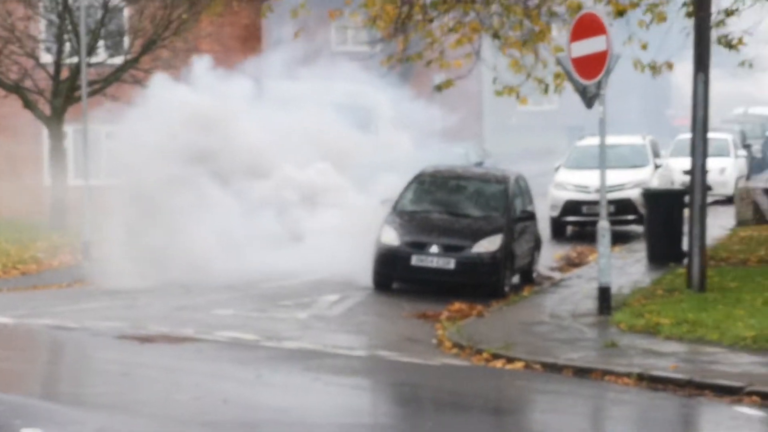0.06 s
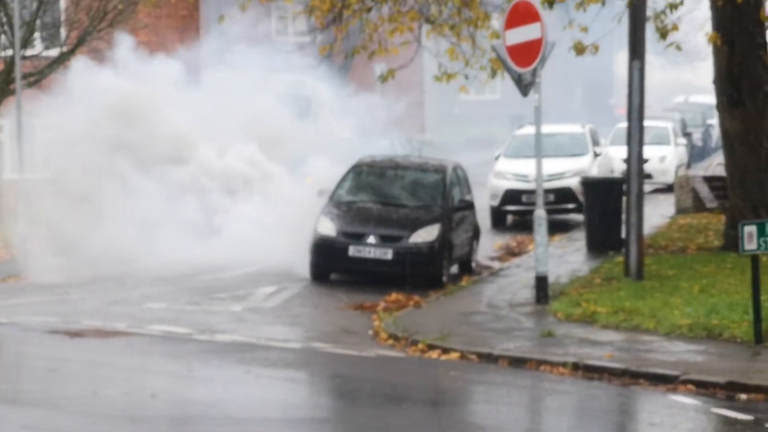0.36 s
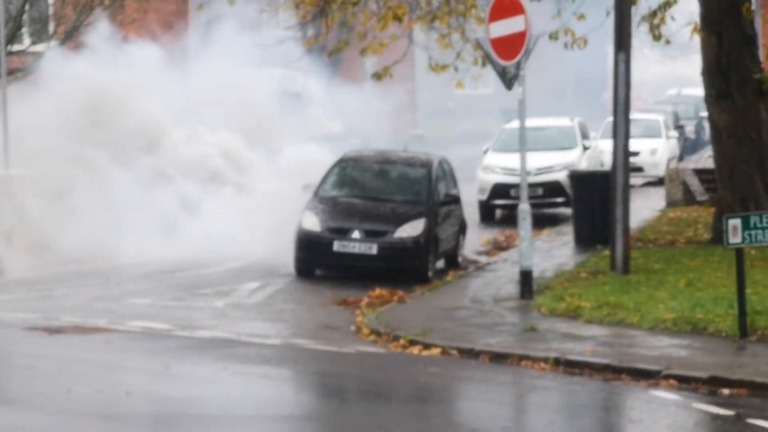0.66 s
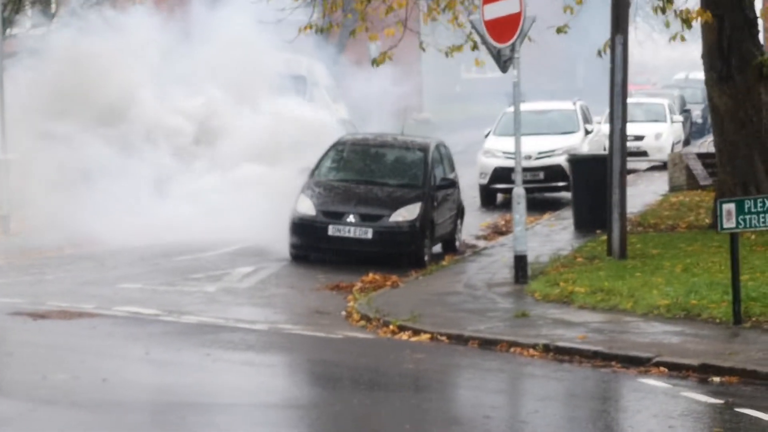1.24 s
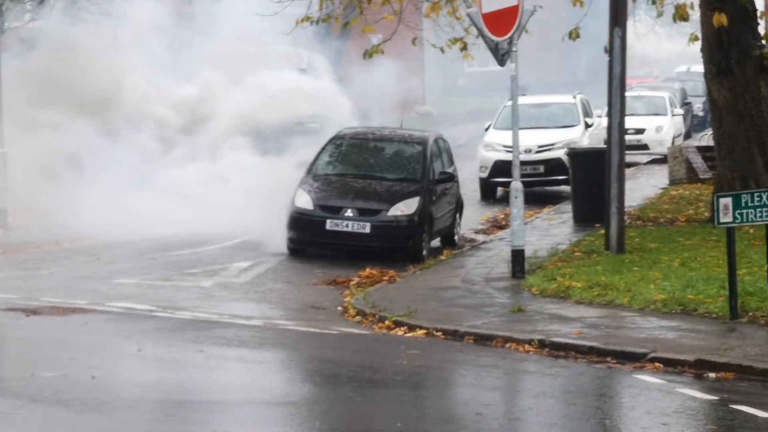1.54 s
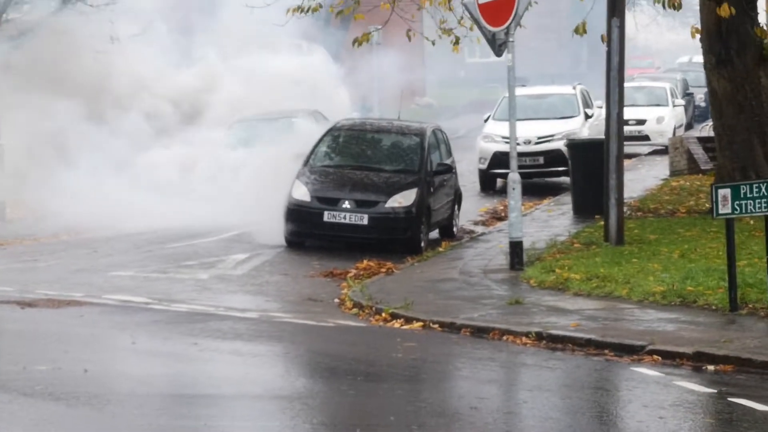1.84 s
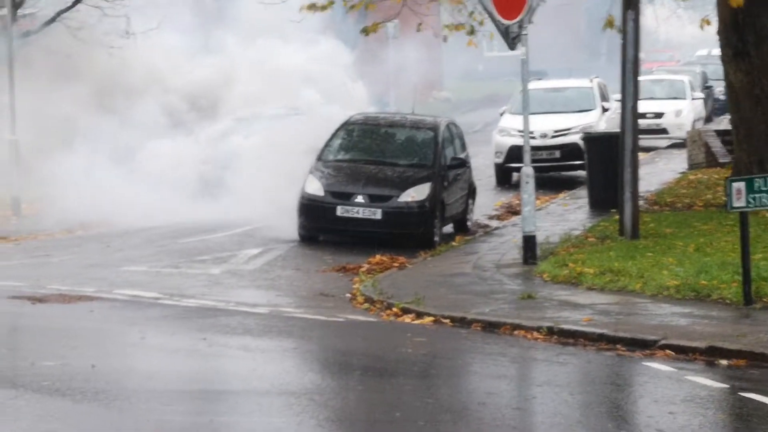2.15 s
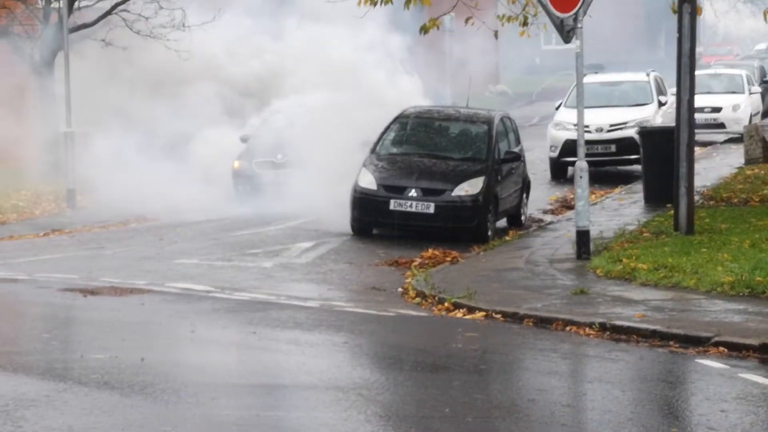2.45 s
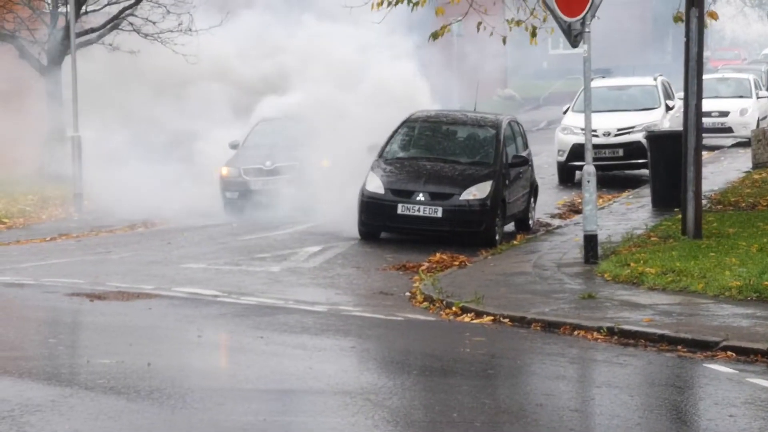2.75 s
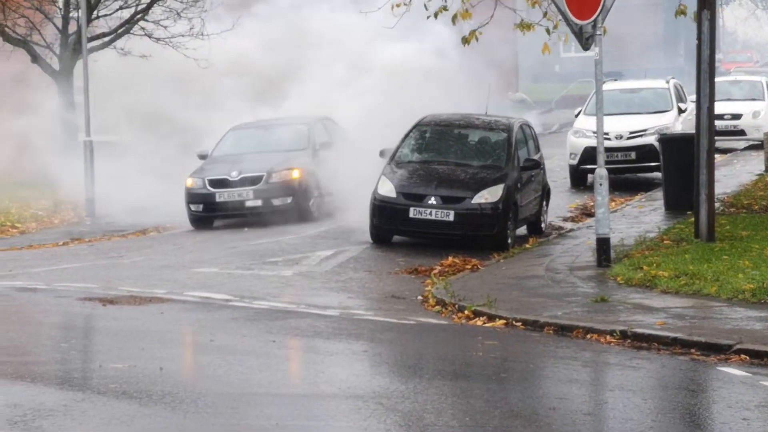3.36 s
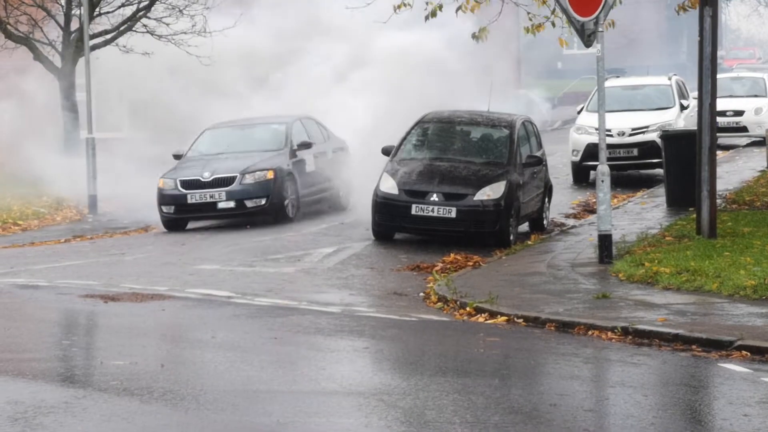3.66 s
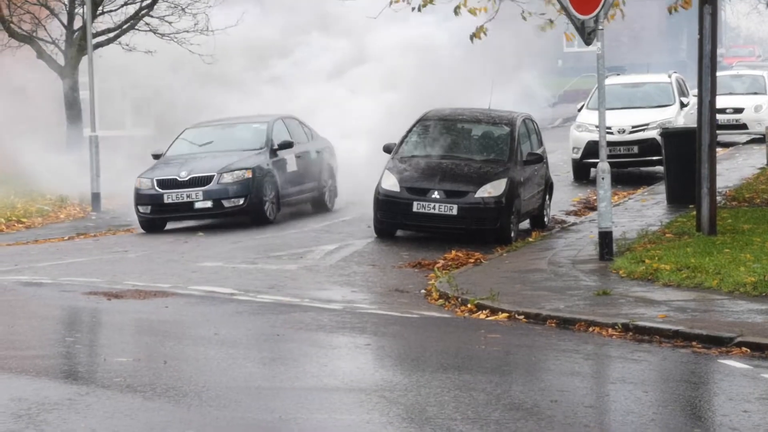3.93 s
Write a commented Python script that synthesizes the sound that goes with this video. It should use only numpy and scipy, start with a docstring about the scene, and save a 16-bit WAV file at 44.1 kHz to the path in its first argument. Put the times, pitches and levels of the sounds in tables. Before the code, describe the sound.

A diesel engine races at high revs for the whole four seconds, with rapid knocking, a shrill metallic whine and hissing gas over a faint street wash. From about 2 seconds it creeps slightly faster and grows raspier, and a thin whistle comes and goes. Wind gusts rumble and thump on the microphone on and off until about 2.3 seconds, then again near 3.8 seconds.

```python
"""Runaway diesel in a street.

The engine races at about 4250 rpm, creeping faster. Six firings a cycle knock in the block,
ring a shrill metal resonance and drive a hiss of gas; house fronts scatter the sound.
Clean multiples of the cycle rate whine and drone. Gusts buffet and thump the microphone."""
import sys
import numpy as np
from scipy import signal
from scipy.fft import rfft, irfft
from scipy.io import wavfile
from scipy.ndimage import uniform_filter1d

SR = 44100
rng = np.random.default_rng(int(sys.argv[2]) if len(sys.argv) > 2 else 0)


def wav_out(sig):
    """Save sig, one row per channel (or a flat mono array), as 16-bit PCM at SR to the path in sys.argv[1]."""
    wavfile.write(sys.argv[1], SR, np.round(np.clip(np.atleast_2d(sig).T, -1, 1) * 32767).astype(np.int16))


N = 176400
CYLINDERS, FIRING_SCATTER_DB = 6, 1.56
LOW_RPM, HIGH_RPM = 4220, 4325
MIC_LAG_MS = .41

# Engine speed: time_s, speed_rpm
ENGINE_SPEED = [(0, 4234), (.3, 4224), (.8, 4217), (1.7, 4224), (2, 4235), (2.3, 4254), (2.85, 4274),
                (3.35, 4312), (4, 4338)]
# Engine voices, relative levels: time_s, knock_db, ring_db, hiss_db
VOICE_LEVELS = [(0.0, -30, -21.5, -35.5), (0.08, -31, -26.5, -39), (0.44, -30.5, -26, -36.5),
                (0.75, -31, -27.5, -39), (1.0, -30.5, -25.5, -37.5), (1.38, -33, -27, -38.5),
                (2.02, -28, -24.5, -36), (2.08, -28, -23, -35.5), (2.44, -30.5, -25.5, -35.5),
                (2.61, -29.5, -25.5, -38.5), (3.02, -29.5, -24.5, -35.5), (3.29, -30.5, -23.5, -36.5),
                (3.54, -28, -24.5, -36), (4.0, -33.5, -27.5, -37.5)]
# Cylinders over the steady bed, in firing order: knock_db, ring_low_rev_db, hiss_db, ring_high_rev_db
CYLINDER_LEVELS = [(-14.5, 7.5, -5.5, -1.5), (3, -9, -8, -2), (-4, 2.5, -18, -1), (-3, -5, -3, 5),
                   (-2, -3, -5.5, 10.5), (-9, -16, -23, -10)]
# Block knock: freq_hz, density_db
KNOCK_SPECTRUM = [(330, -21), (620, -25.5), (850, -18), (1250, -14), (1480, -7.5), (1650, -8.5), (1880, -1),
                  (2150, -4), (2500, -5), (3200, -8.5)]
# Metal resonance: freq_hz, density_db
RING_SPECTRUM = [(1700, -13), (2250, -14), (2500, -5.5), (2720, -3.5), (2900, 2), (3080, -5.5),
                 (3350, -5.5), (3650, -10.5), (3900, -9.5), (4400, -42)]
# Ring partials: order (multiple of the cycle rate, rounded in use), low_rev_db, high_rev_db
WHINE_ORDERS = [(65.8, -53.5, -39), (74, -46.5, -30.5), (77.5, -38, -33), (80.2, -36.5, -29),
                (80.96, -32, -33.5), (82, -37.5, -38), (83.17, -33.5, -35), (83.9, -37, -40)]
# Whine swell: time_s, gain_db
WHINE_SWELL = [(0, 1), (.7, 0), (1.05, 2), (1.4, -0.5), (1.8, -0.5), (2.1, 3), (2.45, -0.5), (2.7, 3),
               (2.95, 0.5), (3.25, 1), (3.55, 2.5), (4, -1.5)]
# Cluster above the whine, relative levels: order (rounded in use), low_rev_db, high_rev_db
RASP_ORDERS = [(85.43, 4, -3), (87, 1, 0), (88.9, -10, -7), (88.3, -18, 10.5), (89.9, 0.5, 0.5),
               (91, -9, 2)]
# Rasp swell: time_s, level_db
RASP_SWELL = [(0, -30.5), (.95, -37.5), (1.75, -33), (2.1, -24), (2.45, -28.5), (2.9, -25.5), (3.25, -25.5),
              (3.55, -33), (4, -35)]
# Lower partials, relative levels: order, low_rev_db, high_rev_db
DRONE_ORDERS = [(3, -45.5, -54), (5, -46.5, -51), (9, -55.5, -63), (13, -56.5, -65), (14, -57, -58),
                (23, -56, -56), (24, -52, -52), (25, -56, -49.5), (26, -62, -63), (31, -48, -45.5),
                (32, -56.5, -49.5), (39, -47.5, -53), (42, -44.5, -45), (43, -45.5, -48), (52, -41, -42.5),
                (57, -44.5, -37.5)]
# Gas hiss: freq_hz, density_db
HISS_SPECTRUM = [(2500, -17), (3800, 0.5), (4400, -3), (5100, 0), (6200, 2), (6850, 0), (7600, -3),
                 (8200, -12), (8750, -20), (9400, -20), (12000, -25.5), (15000, -34.5)]
# Narrow band of the hiss: freq_hz, density_db
WHISTLE_SPECTRUM = [(6200, -26), (6650, 6), (6850, 2.5), (7100, -0.5), (7600, -20.5)]
# Whistle swell: time_s, level_db
WHISTLE_SWELL = [(0, -51), (1.2, -44), (1.7, -42.5), (2, -38.5), (2.2, -45), (2.4, -37), (2.6, -44),
                 (2.8, -38), (3.05, -38.5), (3.3, -46), (4, -55)]
# Wind, deep bass: freq_hz, density_db
RUMBLE_SPECTRUM = [(10, -4.5), (24, -2.5), (40, 1), (65, -3.5), (95, -12.5), (160, -33)]
# Gusts in the deep bass: time_s, relative_db
RUMBLE_GUSTS = [(0.0, -22.5), (0.04, -44), (0.08, -28), (0.51, -37.5), (0.69, -25.5), (0.9, -51),
                (1.08, -25.5), (1.26, -28), (1.28, -35), (1.34, -28), (1.4, -36.5), (1.65, -32),
                (1.67, -34), (1.86, -31), (2.21, -42), (2.31, -26.5), (2.35, -40), (2.46, -39), (2.63, -51),
                (2.66, -44.5), (3.68, -36), (3.81, -25.5), (3.88, -30), (4.0, -33)]
# Wind, upper bass: freq_hz, density_db
BUFFET_SPECTRUM = [(55, -9.5), (85, 2), (110, 0), (170, -6.5), (230, -11), (320, -28), (600, -41)]
# Gusts in the upper bass: time_s, relative_db
BUFFET_GUSTS = [(0.0, -41), (0.04, -35.5), (0.09, -47), (0.15, -23.5), (0.33, -34.5), (0.6, -36.5),
                (0.66, -26.5), (0.87, -37.5), (1.15, -40.5), (1.2, -24.5), (1.3, -41), (1.32, -30),
                (1.39, -40), (1.61, -31.5), (1.79, -39), (1.82, -37), (1.97, -45), (2.0, -29), (2.04, -41),
                (3.31, -46.5), (3.54, -41.5), (3.58, -44), (3.77, -28.5), (3.79, -45), (3.82, -24.5),
                (3.89, -39), (3.98, -35.5), (4.0, -41)]
# Eddies at the microphone: centre_s, strength_db, half_swing_ms
EDDIES = [(.165, -12, 1.8), (.218, -11, 1.6), (.646, -9, 2.4), (.664, -9.5, 7), (.692, -11.5, 3.2),
          (.754, -12, 2.4), (1.208, -12.5, 2.2), (1.335, -17.5, 3), (1.632, -13, 3.5), (2.003, -19.5, 2),
          (2.305, -14.5, 4), (3.836, -7, 5.4)]
# Street wash: freq_hz, density_db
STREET_SPECTRUM = [(100, -23), (250, 3), (400, -8), (620, -9), (850, -4.5), (1200, -8), (1800, -12),
                   (2500, 1)]
# Street wash swell: time_s, level_db
STREET_SWELL = [(0, -35.5), (1.4, -37.5), (2.2, -40.5), (2.8, -39.5), (3.5, -39.5), (4, -39)]


def knock(cycles):
    """Combustion knock in the engine block."""
    envelope = firings(cycles, column=0, attack_ms=.26, decay_ms=1.4)
    sound = voice(cycles, envelope, KNOCK_SPECTRUM, fresh=.19, memory_s=1.2, scattered=.54, lag_ms=-.03)
    return sound * pan(left_db=6) * undb(curve(VOICE_LEVELS, column=1) + .37)


def ring(cycles):
    """Shrill metal clatter: strongest on every other firing at low revs, rebalanced at high revs."""
    slow, fast = (firings(cycles, column, attack_ms=.42, decay_ms=4.5) for column in (1, 3))
    envelope = slow + (fast - slow) * revs()
    sound = voice(cycles, envelope, RING_SPECTRUM, fresh=.16, memory_s=.8, scattered=.2,
                  lag_ms=MIC_LAG_MS)
    return sound * pan(left_db=-3) * undb(curve(VOICE_LEVELS, column=2) - 2)


def whine(cycles):
    """Beating partials of the ring, with a swelling rasp just above."""
    core = partials(cycles, WHINE_ORDERS, waver_db=2.5, spread_turns=.48) * undb(curve(WHINE_SWELL))
    rasp = unit(partials(cycles, RASP_ORDERS, waver_db=3.5, spread_turns=.8)) * undb(curve(RASP_SWELL))
    return place(core + rasp, MIC_LAG_MS) * pan(left_db=-6.5)


def drone(cycles):
    """Lower engine partials; their balance shifts with speed."""
    sound = partials(cycles, DRONE_ORDERS, waver_db=1.4, spread_turns=.99) * undb(-.5)
    return place(sound, lag_ms=.1) * pan(left_db=.5)


def hiss(cycles):
    """Rushing gas and fine ticking, lightly pulsed by the firings."""
    envelope = firings(cycles, column=2, attack_ms=.079, decay_ms=1.4)
    gas = voice(cycles, envelope, HISS_SPECTRUM, fresh=.5, memory_s=1.3, scattered=.7, lag_ms=MIC_LAG_MS)
    return gas * pan(left_db=1) * undb(curve(VOICE_LEVELS, column=3) + 3.5)


def whistle():
    """Narrow edge of the gas hiss that comes and goes."""
    return colour(stereo_noise(apart=.5), WHISTLE_SPECTRUM) * pan(left_db=-7) * undb(curve(WHISTLE_SWELL))


def firings(cycles, column, attack_ms, decay_ms):
    """Envelope: each cylinder strikes, slightly unevenly, and decays over a steady bed."""
    firing = np.floor(cycles * CYLINDERS).astype(int)
    cylinder_db = np.array(CYLINDER_LEVELS)[firing % CYLINDERS, column]
    strength_db = cylinder_db + FIRING_SCATTER_DB * rng.standard_normal(N)[firing]
    onsets = np.diff(firing, prepend=firing[0])
    age_ms = np.arange(SR // 20) * 1000 / SR
    pulse = ((1 - np.exp(-age_ms / attack_ms)) * np.exp(-age_ms / decay_ms)) ** 2
    power = signal.fftconvolve(onsets * undb(strength_db) ** 2, pulse / pulse.sum())[:N] / onsets.mean()
    return np.sqrt(1 + power)


def voice(cycles, envelope, spectrum, fresh, memory_s, scattered, lag_ms):
    """Rattle pulsed by the firings, heard direct and scattered off the house fronts."""
    half_spectrum = np.array(spectrum) * [1, .5]  # applied before and after the pulsing
    rattles = (colour(rattle(cycles, fresh, memory_s), half_spectrum) for _ in range(3))
    direct, left, right = (envelope * even(x, window_ms=4.06) for x in rattles)
    return colour(blend(place(direct, lag_ms), np.array([left, right]), scattered), half_spectrum)


def rattle(cycles, fresh, memory_s, cycle_samples=1280):
    """Slowly changing pattern that repeats each cycle, plus a fresh share of noise."""
    count = int(cycles[-1]) + 2
    memory_cycles = max(int(memory_s * cycles[-1] * SR / N), 1)
    noise = rng.standard_normal(N)
    patterns = rng.standard_normal((2 * count, cycle_samples))
    orders = rfft(uniform_filter1d(patterns, memory_cycles, axis=0, mode="wrap"))
    orders[:, [round(row[0]) for row in DRONE_ORDERS + WHINE_ORDERS]] = 0  # gaps for clean partials
    evened = irfft(orders / np.sqrt(np.abs(orders) + 1e-9)).ravel()
    return blend(unit(evened[(cycles * cycle_samples).astype(int)]), noise, fresh)


def partials(cycles, table, waver_db, spread_turns):
    """Wavering multiples of the cycle rate; at low phase spread they throb once a cycle."""
    sound, climb = 0, revs()
    for order, low_db, high_db in table:
        turns = round(order) * cycles + spread_turns * rng.random() + .042 * waver(rate_hz=23)
        level_db = low_db + (high_db - low_db) * climb + waver_db * waver(rate_hz=12)
        sound = sound + undb(level_db) * np.sqrt(2) * np.sin(2 * np.pi * turns)
    return sound


def revs():
    """Climb from low to high revs, 0-1."""
    return np.clip((curve(ENGINE_SPEED) - LOW_RPM) / (HIGH_RPM - LOW_RPM), 0, 1)


def wind():
    """Gusts on the microphone: rumble and harder buffets, nearly alike on both sides."""
    rumble = colour(stereo_noise(apart=.02), RUMBLE_SPECTRUM) * undb(curve(RUMBLE_GUSTS) + 3)
    buffet = colour(stereo_noise(apart=.077), BUFFET_SPECTRUM) * undb(curve(BUFFET_GUSTS) + .5)
    return rumble + buffet


def thumps(turbulence_db=-16.5):
    """Eddies hit the microphone: one pressure swing and a burst of turbulence each."""
    turbulence = undb(turbulence_db) * even(colour(rng.standard_normal(N), BUFFET_SPECTRUM), window_ms=12)
    sound = 0
    for centre_s, strength_db, half_swing_ms in EDDIES:
        swing = (np.arange(N) / SR - centre_s) * 1000 / half_swing_ms
        sound = sound + undb(strength_db) * np.exp(-swing ** 2 / 2) * (turbulence - swing)
    return place(sound, MIC_LAG_MS)


def street():
    """Diffuse wash of engine noise and traffic between the houses."""
    wash = colour(rng.standard_normal((2, N)), STREET_SPECTRUM)
    return wash * pan(left_db=.5) * undb(curve(STREET_SWELL))


def undb(db):
    """Decibels to gain."""
    return 10 ** (np.asarray(db) / 20)


def curve(table, column=1):
    """Table column, linearly interpolated in time."""
    rows = np.array(table, float)
    return np.interp(np.arange(N) / SR, rows[:, 0], rows[:, column])


def waver(rate_hz):
    """Random values joined by straight lines."""
    return np.interp(np.arange(N) * rate_hz / SR, np.arange(1024), rng.standard_normal(1024))


def unit(x):
    """Scale to rms 1."""
    return x / np.sqrt(np.mean(x ** 2))


def even(x, window_ms):
    """Hold the running rms steady."""
    return x / np.sqrt(uniform_filter1d(x ** 2, max(int(window_ms * SR / 1000), 2)) + 1e-6)


def colour(x, spectrum):
    """Filter by a spectrum, falling 20 dB per octave past its ends; rms 1."""
    freq_hz, density_db = np.array(spectrum, float).T
    bins_oct = np.log2(np.maximum(np.arange(N // 2 + 1) * SR / N, 1))
    points_oct = np.log2(freq_hz)
    outside_oct = np.abs(bins_oct - np.clip(bins_oct, points_oct[0], points_oct[-1]))
    gain_db = np.interp(bins_oct, points_oct, density_db) - 20 * outside_oct
    return unit(irfft(rfft(x) * undb(gain_db), N))


def blend(a, b, share):
    """Mix unrelated sounds; b gets the given share of the power."""
    return np.sqrt(1 - share) * a + np.sqrt(share) * b


def stereo_noise(apart):
    """White noise; apart is the power share independent on each side."""
    return blend(place(rng.standard_normal(N), MIC_LAG_MS), rng.standard_normal((2, N)), apart)


def place(x, lag_ms):
    """Mono to stereo; positive lag delays the right side."""
    return np.array([x, np.roll(x, round(lag_ms * SR / 1000))])


def pan(left_db):
    """Stereo gains for a left-over-right level difference."""
    return undb(np.array([[left_db], [-left_db]]) / 2)


def scene():
    """Four-stroke engine, one cycle per two turns, with street and wind."""
    cycle_hz = curve(ENGINE_SPEED) / 60 / 2
    cycles = .55 + np.cumsum(cycle_hz) / SR  # starts mid-cycle
    engine = knock(cycles) + ring(cycles) + whine(cycles) + drone(cycles) + hiss(cycles) + whistle()
    return engine + street() + wind() + thumps()


def record(dry):
    """Short fade-in and steep low-pass."""
    fade_s, cutoff_hz = .012, 15200
    fade = np.minimum(np.arange(N) / SR / fade_s, 1)
    return signal.sosfilt(signal.ellip(8, .2, 70, cutoff_hz, fs=SR, output="sos"), dry * fade)


dry = scene()
out = record(dry)
wav_out(out)
```